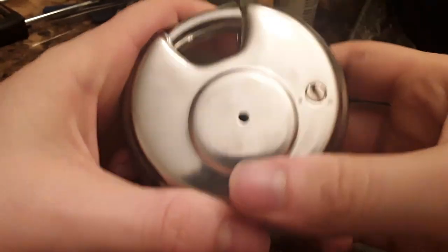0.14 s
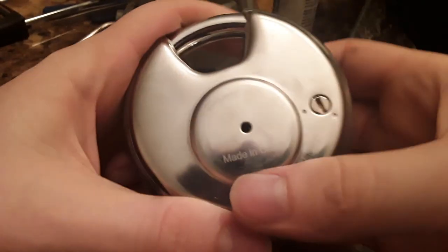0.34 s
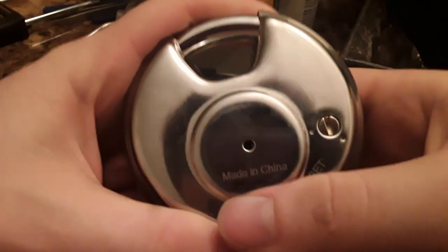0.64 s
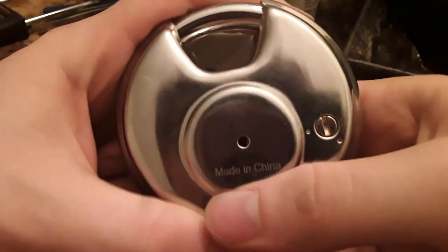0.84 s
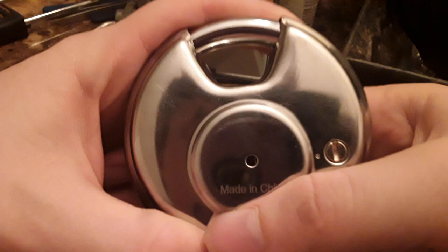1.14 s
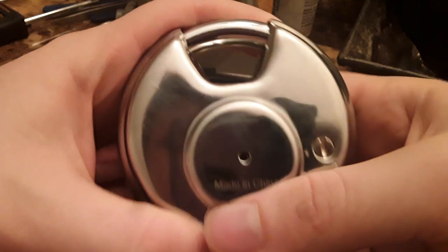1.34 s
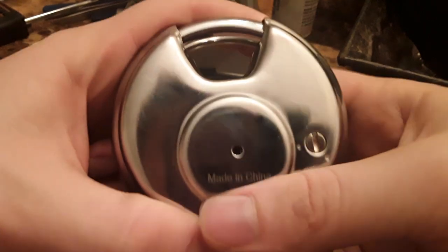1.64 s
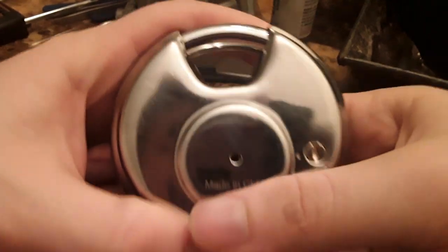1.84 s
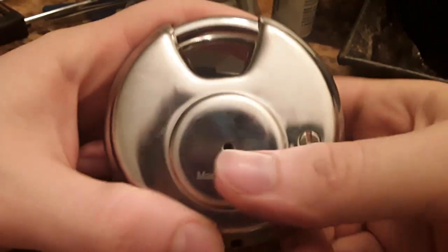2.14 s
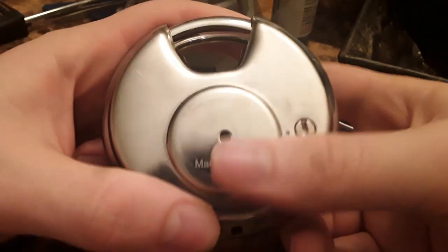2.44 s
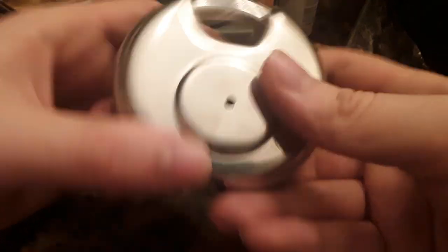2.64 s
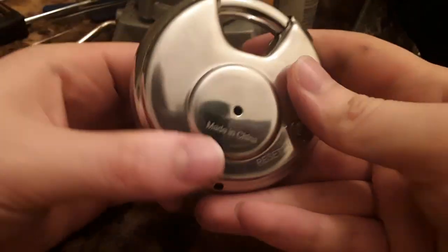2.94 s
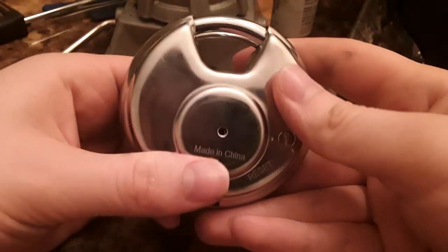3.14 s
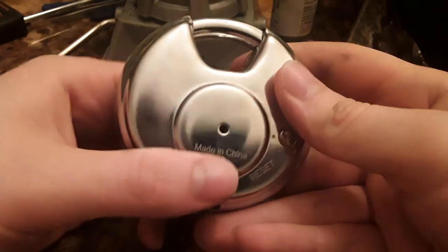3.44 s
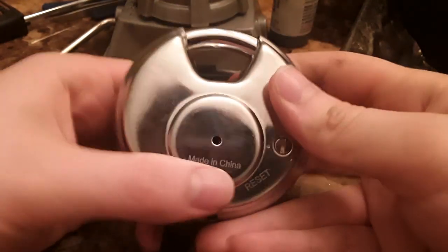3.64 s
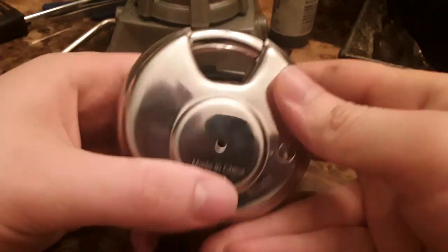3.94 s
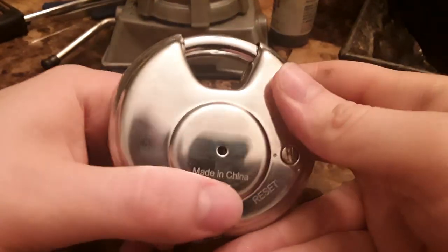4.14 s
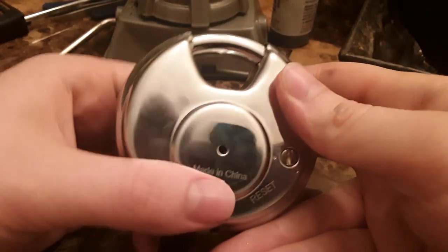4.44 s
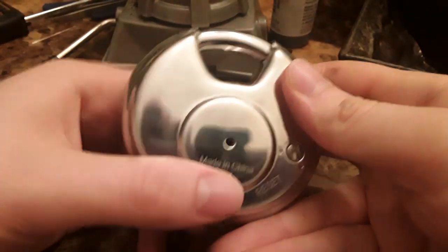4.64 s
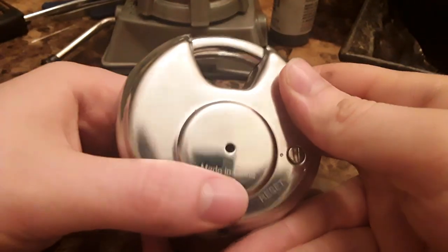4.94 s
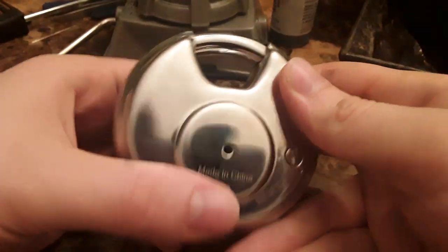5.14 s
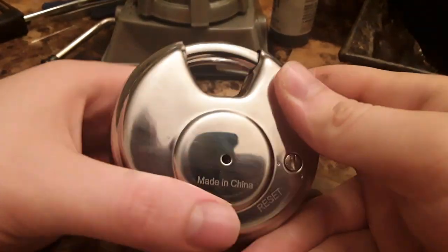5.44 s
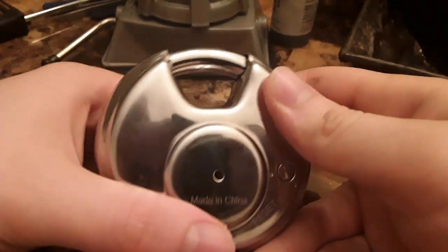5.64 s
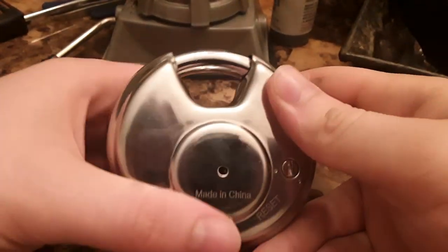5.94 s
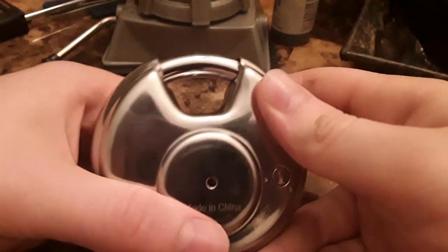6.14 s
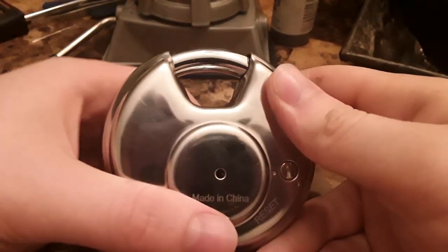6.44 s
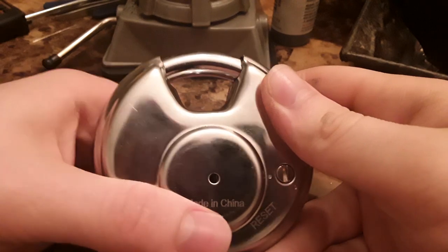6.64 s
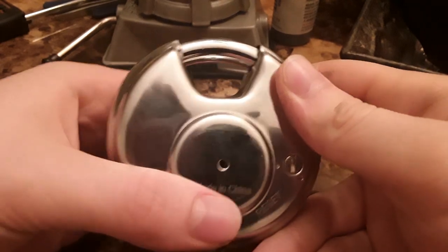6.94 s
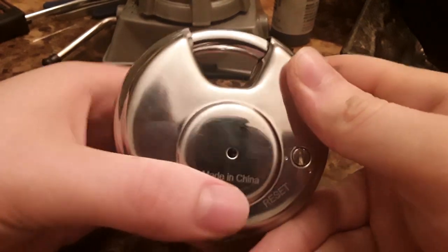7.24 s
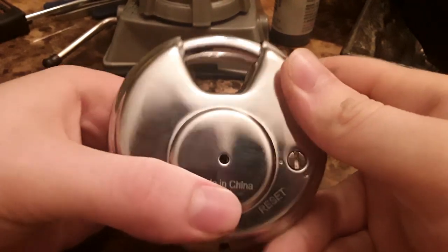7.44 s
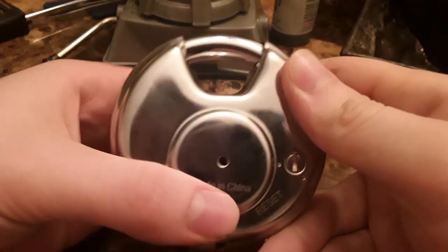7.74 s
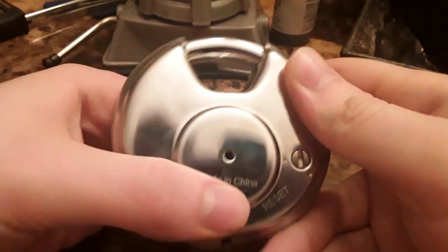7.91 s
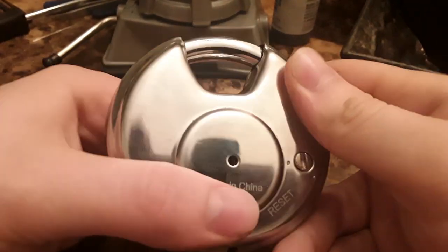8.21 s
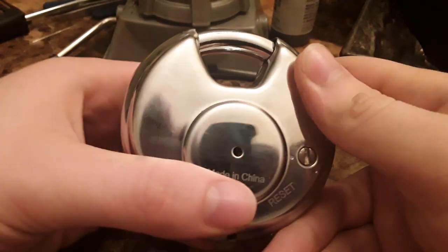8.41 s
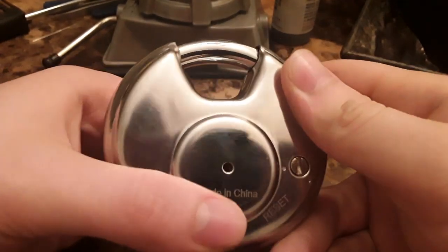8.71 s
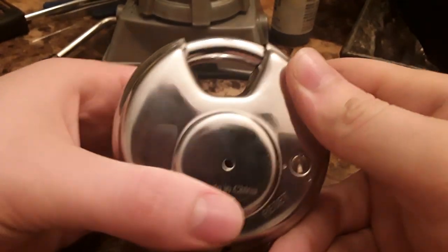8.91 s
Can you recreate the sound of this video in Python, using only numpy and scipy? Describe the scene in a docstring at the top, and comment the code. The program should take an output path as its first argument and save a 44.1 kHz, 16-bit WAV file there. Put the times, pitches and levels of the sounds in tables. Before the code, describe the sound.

Small metal padlock dials click close up, one crisp notch after another, with loose ticks and short gritty scrapes in a quiet room.

```python
"""First a loose dial clicks over faint room air, then a steel combination padlock is worked notch by notch.
The lock is in the hand, close to a two-port microphone: noise bursts through the case's modes make its
snaps and clicks, and dense random slips make the short grating around each snap.
Filtered noise makes the rub of skin and the soft bumps on the fingers; decaying sines are the sprung detent.
A small quiet room answers the lock faintly with scattered reflections that die band by band."""
import sys
import numpy as np
from scipy import signal
from scipy.fft import rfft, irfft
from scipy.io import wavfile
from scipy.ndimage import uniform_filter1d

SR = 44100
rng = np.random.default_rng(int(sys.argv[2]) if len(sys.argv) > 2 else 0)


def put_to_file(sound):
    """Save the sound as 16-bit audio at rate SR, in the file named by the first command-line argument."""
    columns = np.atleast_2d(sound).T  # one column per channel
    safe = np.clip(columns, -1, 1)
    whole_steps = np.round(safe * 32767)
    wavfile.write(sys.argv[1], SR, whole_steps.astype(np.int16))


N = 399987  # samples

# Steady air of the room, relative spectrum: pitch_hz [Hz], density_db [dB per Hz]
AIR_SPECTRUM = [(25, -27), (95, -7), (200, -11.5), (550, -21.5), (1000, -15.5), (1400, -15), (3000, -15),
                (6200, -8), (9000, -14), (16000, -21.5)]
# Time for the room's reflections to fall 60 dB: pitch_hz [Hz], t60_s [s]
ROOM_DECAY = [(500, 0.51), (1300, 0.36), (3500, 0.41), (7000, 0.34), (14000, 0.43)]
# Soft bumps of the lock against the fingers: start_s [s], peak_db [dB]
FINGER_BUMPS = [(2.168, -58.5), (3.095, -56.5), (4.052, -59), (4.09, -52), (4.375, -60)]
# Skin sliding over the case as the grip shifts:
# start_s [s], length_s [s], level_db [dB, dull part], centre_hz [Hz, midway through]
SKIN_RUBS = [(0.065, 0.032, -65, 613), (0.492, 0.2, -64, 590), (.9, 0.043, -60.5, 517),
             (.97, 0.22, -61, 371), (1.564, .27, -65, 288.3), (2.7, .05, -76.5, 459)]
# Broad colour of the case, relative: pitch_hz [Hz], density_db [dB per Hz]
CASE_COLOUR = [(250, -36.5), (630, -31), (950, -12), (1400, -13), (2500, -6.5), (6000, -7.5), (8500, -20),
               (12700, -22), (16000, -27)]
# Resonances of case, dials and detent spring before the contact point shifts them:
# pitch_hz [Hz], width_hz [Hz], height_db [dB over the broad colour]
LOCK_MODES = [(1307, 160, 15), (1813, 227, 10.5), (3104, 420, 2.5), (4780, 234, 4.5), (6270, 730, 2.5),
              (9030, 110, 4.5)]
# Plucks of the detent spring: start_s [s], level_db [dB at the start, before stereo balance], pitch_hz [Hz]
SPRING_PLUCKS = [(1.245, -55, 12570), (1.775, -48, 12570), (3.685, -50, 12570), (4.476, -40, 12570),
                 (4.987, -44, 6200)]
# A dial turned one notch, dragging before and after its detent snaps home: snap_s [s], drag_before_s [s],
# drag_after_s [s], ring_db [dB, steel ring before stereo balance], tick_db [dB above the ring]
DIAL_TURNS = [(0.083, 0.014, 0.0098, -36, -1), (0.5125, 0.021, 0.0097, -35, 0.5),
              (0.735, 0.013, 0.0206, -27.5, -2.5), (1.09, 0.014, 0.029, -33.5, -7),
              (1.4036, 0.0043, 0.025, -31, -6), (1.7745, 0.0083, 0.015, -29.5, 8),
              (3.3039, 0.028, 0.0086, -27.5, 0), (3.6841, 0.021, 0.023, -32, 6.5),
              (4.0969, 0.021, 0.011, -32, 1.5), (4.4861, 0.018, 0.0089, -31, 1),
              (4.846, .025, 0.014, -30.5, -2.5), (6.5819, 0.018, 0.024, -33.5, -3),
              (7.0067, 0.011, .028, -32, 4.5), (7.423, 0.025, .005, -29, 2.5), (7.8063, 0.019, .01, -32, 5),
              (8.1556, 0.02, .028, -29.5, 6.5), (8.5802, 0.016, 0.028, -34.5, -5),
              (9.0149, 0.0043, 0.019, -33, -9)]
# A loose dial knocked against its stop as the thumb lands or lets go: start_s [s],
# ring_db [dB, steel ring before stereo balance], knock_db [dB above ring], tick_db [dB above ring]
LOOSE_CLICKS = [(0.0258, -31, -6.5, -7), (0.173, -37.5, -4, -16), (0.3425, -27, 0.5, -11),
                (0.46, -38.5, -2.5, -6), (0.572, -35.5, -7, -5), (0.6804, -42, -2.5, -17),
                (0.7896, -29.5, -13, -8.5), (0.9951, -35.5, 10, -21), (1.1098, -31.5, -2, -6),
                (1.2452, -40.5, -11, -0.5), (1.3603, -35.5, -4, -4.5), (1.4282, -30, -2, -10),
                (1.562, -35, -3, -13.5), (1.6761, -41, -8, -11), (1.7414, -39, -4, -11),
                (1.8515, -31.5, -4, -11.5), (2.1644, -31, -18, -3.5), (2.1757, -34, -9, -2),
                (2.1882, -36, -13, -4), (2.1992, -45.5, -20, 5), (2.3655, -50.5, -9, -7),
                (2.7829, -44.5, -2, -14), (2.836, -35, 9.5, -5.5), (3.0633, -39.5, 2.5, -21),
                (3.1022, -34, -2.5, -9), (3.202, -38.5, -8.5, -2.5), (3.3667, -33, -13, -15),
                (3.431, -38, -9, -27), (3.4506, -41.5, 4, -29), (3.4927, -35, 5.5, -15),
                (3.5746, -40.5, 9, -24), (3.5871, -41.5, 4, -13), (3.7117, -35.5, -2, -9),
                (3.8541, -30.5, -7, -22), (3.908, -36, -6, -15), (4.0363, -31.5, -11, -2.5),
                (4.0599, -31.5, 1, -1.5), (4.1158, -26.5, -5, -9), (4.2715, -37, 3.5, -18),
                (4.2939, -33, 7, -6), (4.306, -28, -16, -7), (4.3824, -42.5, -6, 0.5),
                (4.4455, -38, -3, -9), (4.475, -42.5, 8, 15.5), (4.5648, -43.5, 5.5, -22),
                (4.7573, -44.5, -7, 2), (4.9862, -26.5, -9, -12), (5.0982, -34, -6, -1.5),
                (5.172, -41.5, 1.5, -10), (5.1973, -36.5, -1, -5), (5.2164, -36, 0, -3),
                (5.3948, -30.5, -9.5, -16), (5.4329, -40.5, -4, -3.5), (5.5377, -48.5, 8.5, -16),
                (5.5613, -44.5, 6, -10), (5.6015, -42.5, 9.5, -13), (5.8502, -36.5, 1, -14),
                (5.9984, -46.5, 2.5, 1), (6.0649, -38, 6, -8), (6.1024, -49.5, 16, -13),
                (6.1231, -45.5, 0.5, 4.5), (6.1703, -43, 1, -14), (6.1897, -39, -5, -12),
                (6.2279, -47, 3.5, -19), (6.3351, -30, -3.5, -5.5), (6.5991, -41.5, 11.5, 4),
                (6.6502, -41.5, 6, -9), (6.7366, -33.5, -0.5, -9), (6.9248, -34.5, -4, -5),
                (7.0873, -41, -0.5, -6), (7.1511, -35.5, -6.5, -11), (7.3213, -35, -4.5, 6),
                (7.3331, -37, -4, 3), (7.508, -32, -2, -7), (7.7009, -39, -6, 2), (7.7588, -41.5, -3, -3),
                (7.853, -36, -7.5, 3), (8.0636, -37.5, -10.5, -1.5), (8.1186, -32.5, 8, -2),
                (8.227, -45, 2, -1), (8.2662, -27.5, -4, -9.5), (8.326, -45.5, -22, 2), (8.552, -36, 2, -9),
                (8.5639, -34, -13, -7), (8.748, -28.5, -8, -9), (8.8753, -35.5, 0, 0),
                (8.8954, -36.5, -10, 1.5), (8.9984, -37, 1.5, 2)]

AIR_DB = -59
RUB_RISE_DB_PER_S, RUB_FADE_DB_PER_S = 197, 119  # each slide swells, holds and dies away
RUB_SAG_OCT_PER_S = 0.36  # and sinks in pitch as it slows
KNOCK_TOP_HZ, RING_TOP_HZ = 2400, 8000  # where knock gives way to ring, and ring to tick
DRAG_DB = -3  # grating relative to its snap's ring, before the shares of the three bands
SNAP_KNOCK_DB = -1  # every snap has the same hollow knock, dB above its ring
RECORDER_TOP_HZ = 16100


def gain_of(db):
    """Decibels to amplitude."""
    return 10 ** (np.asarray(db) / 20)


def evened(x):
    """Scales to rms 1."""
    return x / np.sqrt(np.mean(x ** 2) + 1e-20)


def read(points, hz):
    """A table of (Hz, value) joined on a log-frequency axis."""
    f, value = np.transpose(points)
    return np.interp(np.log(hz + 1), np.log(f + 1), value)


def band_noise(count, low_hz, high_hz):
    """Noise of rms 1 between two edges, in count channels."""
    band = signal.butter(2, (low_hz, high_hz), "band", fs=SR, output="sos")
    return evened(signal.sosfilt(band, rng.standard_normal((count, N))))


def add(mix, start_s, sound):
    """Adds a sound to the stereo mix at start_s, cut off at the end of the mix."""
    part = mix[:, max(round(start_s * SR), 0):][:, :sound.shape[-1]]
    part += sound[..., :part.shape[1]]


def hush(alike_below_hz=500):
    """Steady room air, partly alike in both ports in the bass and less so higher up."""
    hz = np.fft.rfftfreq(N, 1 / SR)
    noise = rfft(rng.standard_normal((3, N)))
    shared = .5 / (1 + (hz / alike_below_hz) ** 2)
    pair = np.sqrt(shared) * noise[2] + np.sqrt(1 - shared) * noise[:2]
    air = irfft(pair * gain_of(read(AIR_SPECTRUM, hz)), N)
    return gain_of(AIR_DB) * evened(air)


def room(x, wet_db=-11.0, first_s=0.0069):
    """Reflections of random sign arrive after a short gap, each band dying at its own speed."""
    taps = rng.choice([-1., 1.], (2, SR)) * (rng.random((2, SR)) < 1 / 10)
    hz, t, bands = signal.stft(taps, SR, nperseg=256)
    fade = gain_of(-60 * t / read(ROOM_DECAY, hz)[:, None])
    tail = signal.istft(bands * fade, SR)[1]
    tail = tail / np.linalg.norm(tail[0])
    tail = np.pad(tail, ((0, 0), (round(first_s * SR), 0)))
    return gain_of(wet_db) * signal.fftconvolve(x, tail, axes=1)[:, :N]


def bumps(bump_hz=260, bump_s=0.023, size=3000):
    """The lock bumps softly on the fingers: decaying noise through a low band."""
    out, t = np.zeros((2, N)), np.arange(size) / SR
    flesh = signal.butter(2, [bump_hz / 2, bump_hz * 1.45], "band", fs=SR, output="sos")
    for start_s, peak_db in FINGER_BUMPS:
        thud = rng.standard_normal(size) * np.exp(-t / bump_s)
        bump = signal.sosfilt(flesh, thud)
        add(out, start_s, gain_of(peak_db) * bump / abs(bump).max())
    return out


def rubs(width_hz=210, swish_hz=(1200, 2300), swish_db=3.0):
    """Skin rubs with a dull noise that sinks in pitch, and a swish of fixed band above it."""
    out, t = np.zeros((2, N)), np.arange(N) / SR
    # slow complex noise, moved up to the rub's pitch below
    slow = rng.standard_normal((3, N)) + 1j * rng.standard_normal((3, N))
    slow = signal.sosfilt(signal.butter(2, width_hz / 2, fs=SR, output="sos"), slow)
    pair = slow[:2] / 2 + slow[2]
    pair = np.sqrt(2) * pair / np.std(pair)
    swish = band_noise(2, *swish_hz)
    for start_s, length_s, level_db, centre_hz in SKIN_RUBS:
        near = abs(t - start_s) < 1
        age = t[near] - start_s
        rise_db = RUB_RISE_DB_PER_S * np.minimum(age, 0)
        fade_db = RUB_FADE_DB_PER_S * np.maximum(age - length_s, 0)
        pitch_hz = centre_hz * 2 ** (-RUB_SAG_OCT_PER_S * (age - length_s / 2))
        carrier = np.exp(2j * np.pi * np.cumsum(pitch_hz) / SR)
        dull = (pair[:, near] * carrier).real
        out[:, near] += gain_of(level_db + rise_db - fade_db) * (dull + gain_of(swish_db) * swish[:, near])
    return out


def causal(db, size=1024):
    """The minimum-phase impulse response of a gain curve."""
    both_sides = np.r_[db, db[-2:0:-1]]
    log_gain = np.log(gain_of(np.maximum(both_sides, -100)))
    return np.fft.ifft(np.exp(np.conj(signal.hilbert(log_gain)))).real[:size]


def case_bands(contact_db=4.5, size=4096):
    """The case's response as hollow knock, steel ring and bright tick; the point of contact favours some modes."""
    hz = np.fft.rfftfreq(size, 1 / SR)
    peaks = 0
    for pitch_hz, width_hz, height_db in LOCK_MODES:
        height = gain_of(height_db + contact_db * rng.standard_normal()) ** 2
        peaks = peaks + height / (1 + (2 * (hz - pitch_hz) / width_hz) ** 2)
    knock = 1 / (1 + (hz / KNOCK_TOP_HZ) ** 16)
    below_tick = 1 / (1 + (hz / RING_TOP_HZ) ** 16)
    shares = knock, below_tick * (1 - knock), 1 - below_tick
    colour_db = read(CASE_COLOUR, hz)
    return [causal(colour_db + 10 * np.log10((1 + peaks) * share + 1e-12)) for share in shares]


def ports(force, response, likeness=.65, delay=8):
    """Two forces become two partly alike channels; sound reaches the right port delay samples later."""
    mixed = likeness * force[0] + np.sqrt(1 - likeness ** 2) * force[1]
    pair = np.array([force[0], mixed])
    left, right = signal.fftconvolve(pair, response[None], axes=1)
    return np.array([left, np.r_[np.zeros(delay), right[:-delay]]])


def notches():
    """Every impact of a dial, snaps and loose clicks alike: (start_s, ring_db, knock_db, tick_db)."""
    snaps = [(snap_s, ring_db, SNAP_KNOCK_DB, tick_db) for snap_s, _, _, ring_db, tick_db in DIAL_TURNS]
    return snaps + list(LOOSE_CLICKS)


def spring(t60_s=0.18, size=12000):
    """Now and then a notch plucks the detent spring, which sings on thinly as a decaying sine."""
    out, t = np.zeros((2, N)), np.arange(size) / SR
    for start_s, level_db, pitch_hz in SPRING_PLUCKS:
        add(out, start_s, gain_of(level_db - 60 * t / t60_s) * np.sin(2 * np.pi * pitch_hz * t))
    return out


def slack(contacts, below_db=21.5, spread_db=3.5, within_s=.07, knock_db=2.0, count=2, size=700):
    """Loose dials tick faintly in their play as they settle, the more so after a hard impact."""
    out, fade = np.zeros((2, N)), np.exp(-np.arange(size) / SR / .003)
    for start_s, ring_db, _, _ in notches() * count:
        knock, ring, tick = contacts[rng.integers(len(contacts))]
        lateness, strength = rng.standard_normal(2)
        response = gain_of(knock_db) * knock + ring + tick
        sound = ports(rng.standard_normal((2, size)) * fade, response)[:, :size]
        level_db = ring_db - below_db + spread_db * min(strength, 2)
        add(out, start_s + within_s * np.tanh(abs(lateness)), gain_of(level_db) * evened(sound))
    return out


def grating(bands, slips_per_s=800, spread_db=0.5, band_db=(-5.5, -2.5, -8)):
    """Dense tiny stick-slips while a dial drags on its spindle, heard through knock, ring and tick bands."""
    level = np.zeros(N)
    for snap_s, before_s, after_s, ring_db, _ in DIAL_TURNS:
        dragging = slice(round((snap_s - before_s) * SR), round((snap_s + after_s) * SR))
        level[dragging] = gain_of(ring_db + DRAG_DB)
    slips = (rng.random((2, N)) < slips_per_s / SR) * rng.choice([-1, 1], (2, N))
    slips = slips * gain_of(spread_db * np.minimum(rng.exponential(1, (2, N)), 4))
    grate = np.zeros((2, N))
    for response, share_db in zip(bands, band_db):
        grate += evened(ports(slips, response)[:, :N]) * gain_of(share_db)
    return grate * uniform_filter1d(level, size=130)  # edges softened over 130 samples


def detents(contacts, snap=3.1, rattle_s=(.0042, .0031, .0033), rise_s=0.00043, size=900):
    """Each impact is one blow, then a few milliseconds of chatter while the hand damps the case."""
    out, t = np.zeros((2, N)), np.arange(size) / SR
    nominal = .005 * SR  # samples over which a click's energy is counted for its level
    for start_s, ring_db, knock_db, tick_db in notches():
        chatter = rng.standard_normal((2, size))
        bands = contacts[rng.integers(len(contacts))]
        levels_db = ring_db + knock_db, ring_db, ring_db + tick_db
        for response, level_db, decay_s in zip(bands, levels_db, rattle_s):
            force = chatter * np.exp(-(t / decay_s) ** 1.3) * -np.expm1(-t / rise_s)
            force[0, 0] += snap
            click = ports(force, response)
            energy = np.sum(click ** 2 / 2)
            add(out, start_s, gain_of(level_db) * click * np.sqrt(nominal / energy))
    return out


def scene(left_db=0.53, count=24):
    """The lock, a little louder on the left, with the hands and the room."""
    contacts = [case_bands() for _ in range(count)]  # places where a dial may strike the case
    lock = spring() + slack(contacts) + grating(np.mean(contacts, axis=0)) + detents(contacts)
    lock = lock * gain_of([[left_db], [-left_db]])
    return hush() + room(lock) + bumps() + rubs() + lock


def record(dry):
    """The recorder's band limit: a linear-phase low-pass."""
    low_pass = signal.firwin(511, RECORDER_TOP_HZ, window=("kaiser", 9), fs=SR)
    return signal.oaconvolve(dry, low_pass[None], "same")


dry = scene()
out = record(dry)
put_to_file(out)
```